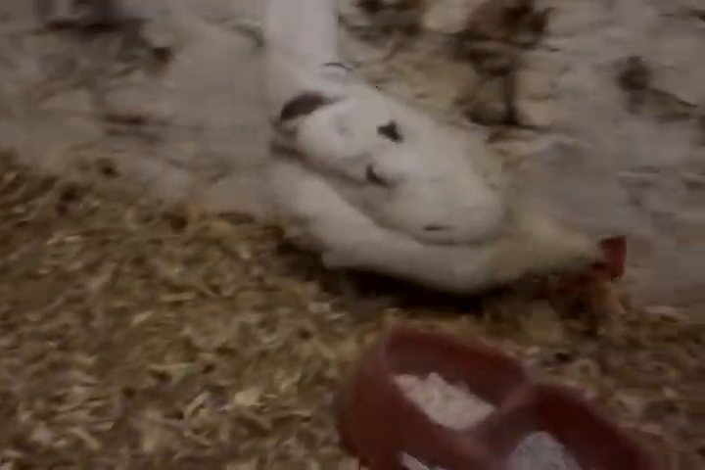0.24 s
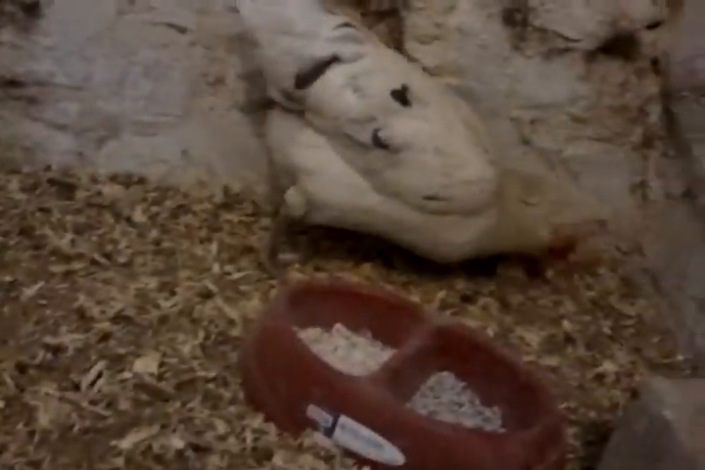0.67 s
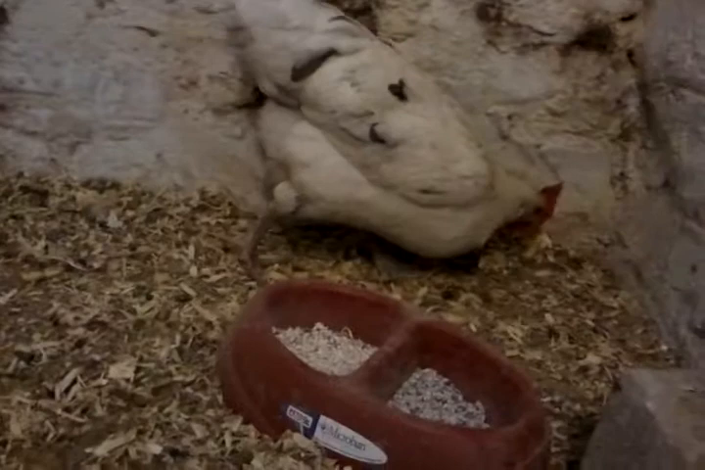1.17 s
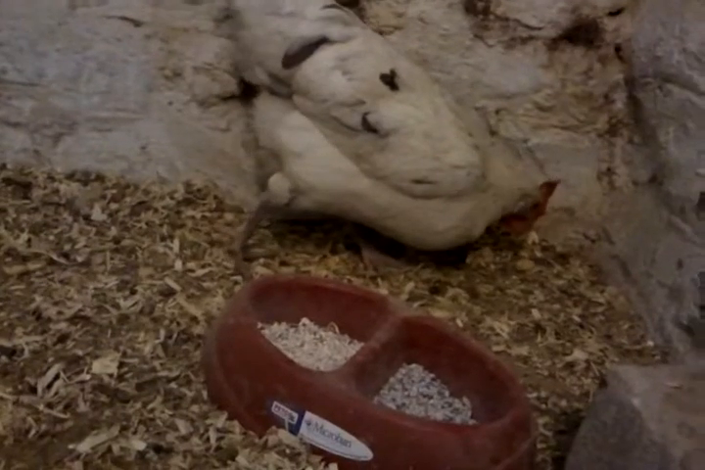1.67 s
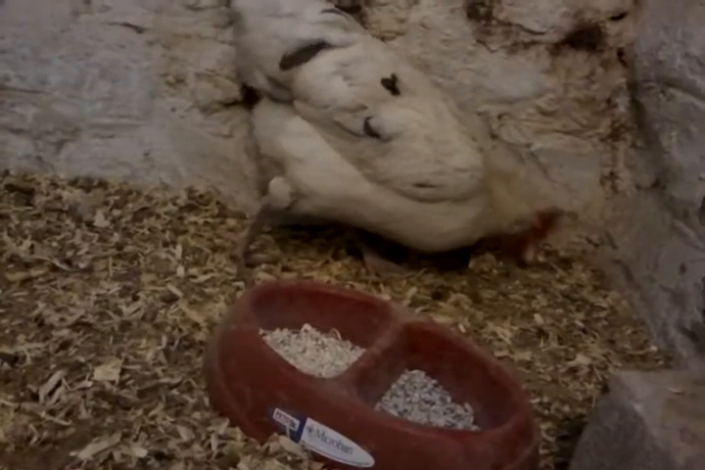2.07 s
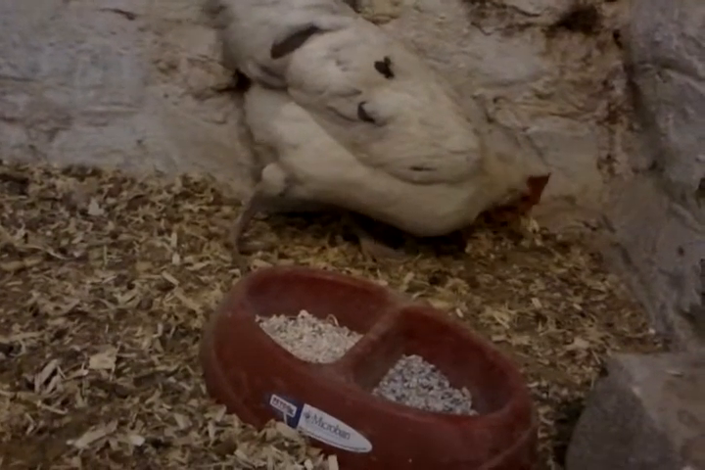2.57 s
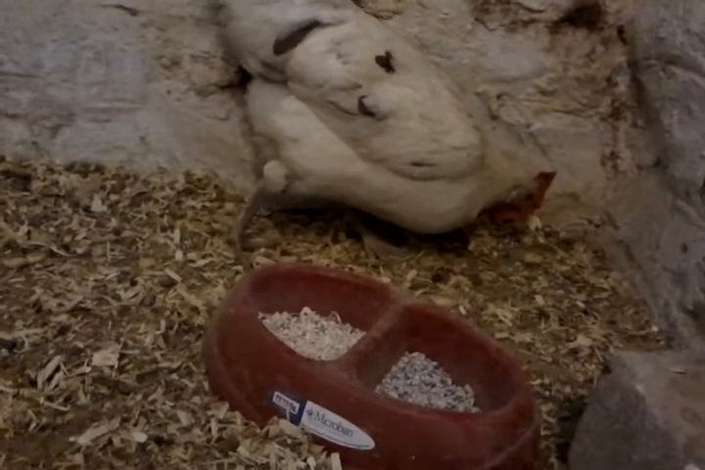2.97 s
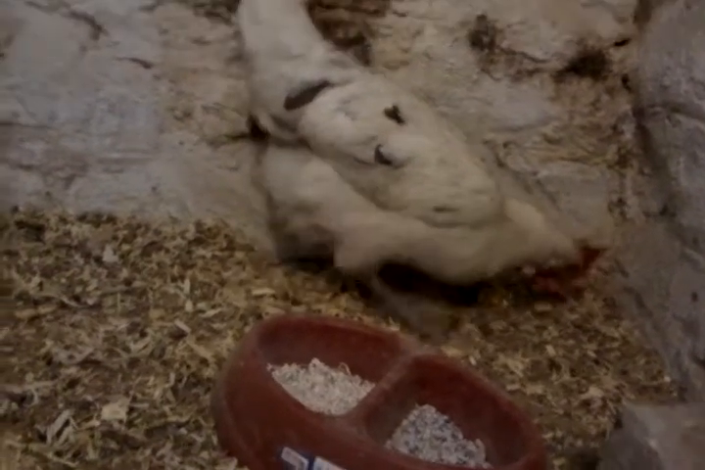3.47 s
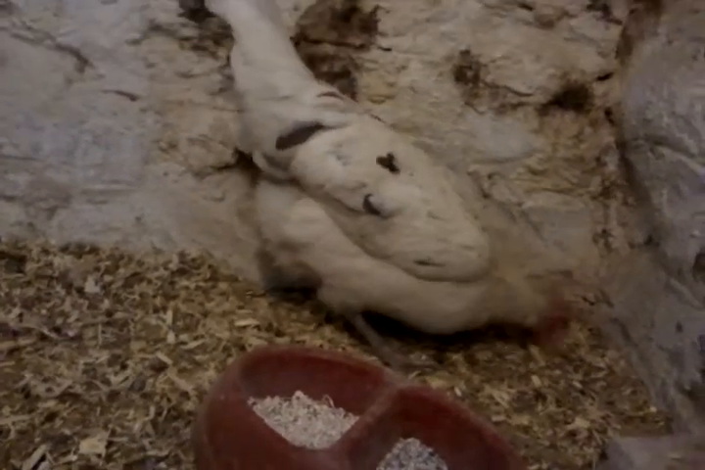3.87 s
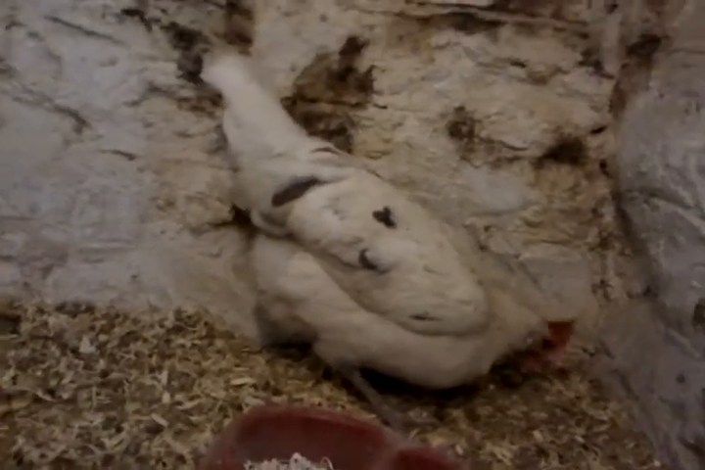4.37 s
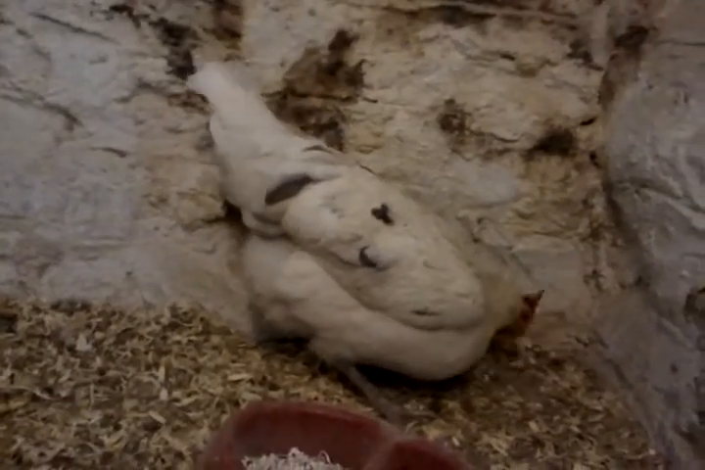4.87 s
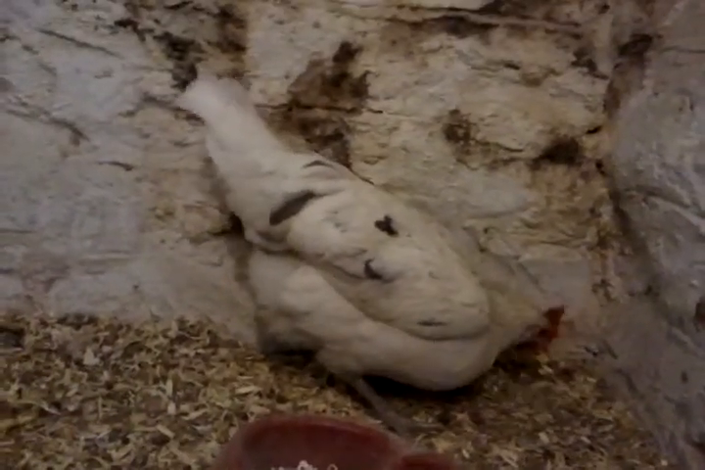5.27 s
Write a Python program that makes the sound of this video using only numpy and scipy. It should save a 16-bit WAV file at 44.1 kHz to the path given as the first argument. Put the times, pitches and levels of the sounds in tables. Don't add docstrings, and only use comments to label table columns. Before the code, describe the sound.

A hen pecks in quick irregular bursts, bright brittle snaps and crunches with small chips, pausing between, above quiet rumble and hiss.

```python
import sys
import numpy as np
from scipy import signal
from scipy.fft import rfft, irfft, next_fast_len
from scipy.io import wavfile
from scipy.ndimage import uniform_filter1d, map_coordinates

SR = 44100
rng = np.random.default_rng(int(sys.argv[2]) if len(sys.argv) > 2 else 0)


def volts(x):
    e = np.asarray(x, float) / 20
    return 10 ** e


def transcribe(u):
    v = np.clip(np.atleast_2d(u).T, -1, 1)
    q = np.round(v * 32767).astype(np.int16)
    wavfile.write(sys.argv[1], SR, q)


N = 244314

# hz, level_db
LITTER_COLOUR = [(300, -5), (900, -2), (1600, -4), (2300, -5), (3000, -5.5), (3900, -9), (4700, -10.5),
                 (5400, -10.5), (6300, -14), (7300, -17), (8300, -28.5), (9300, -29.5)]
LOW_RING_HZ, HIGH_RING_HZ = 3670, 5300
DRY_KNOCK_DB = -26.5


def unit(x):
    return x / np.sqrt(np.mean(x ** 2) + 1e-20)


def along(points, hz):
    f, v = np.transpose(points)
    return np.interp(np.log(hz + 1), np.log(f + 1), v)


def wobble(rate):
    knots = rng.standard_normal(int(N * rate / SR) + 4)
    return map_coordinates(knots, [np.arange(N) * rate / SR])


def filtered(x, response):
    m = next_fast_len(x.shape[-1] + 1024)
    return irfft(rfft(x, m) * response(np.fft.rfftfreq(m, 1 / SR)), m)[..., :x.shape[-1]]


def band(low_hz, high_hz):
    return lambda hz: 1 / (1 + (hz / high_hz) ** 4) / (1 + (low_hz / (hz + 1)) ** 4)


def add(track, s, sound):
    part = track[max(round(s * SR), 0):][:len(sound)]
    part += sound[:len(part)]


def beak(rows, echoed):
    grit_edge = 0.78
    bounce_s, bounce_db = 0.0016, -16.5
    out, t = np.zeros(N), np.arange(SR // 60) / SR
    lag = round(bounce_s * SR)
    for s, db, low_hz, high_hz, high_db, knock_db in rows:
        turn, size = rng.uniform(0, 2 * np.pi, 2), rng.uniform(0.75, 1.2)
        rise = (1 - np.exp(-t / 0.00063)) ** 2
        shape = rise * volts(-60 * t / (0.008 * size))
        rings = volts(min(-high_db, 0)) * np.sin(2 * np.pi * low_hz * t + turn[0])
        rings = rings + volts(min(high_db, 0)) * np.sin(2 * np.pi * high_hz * t + turn[1])

        grit = rng.standard_normal((2, len(t)))
        grit_band = band(0.85 * grit_edge * low_hz, 12000)
        crack = unit(filtered(grit[0], lambda hz: volts(along(LITTER_COLOUR, hz)) * grit_band(hz) ** 2))
        crack = crack * volts(0.49 * min(high_db, 0))
        knock = shape * filtered(grit[1], lambda hz: ground(hz) * band(700, 2600)(hz))
        knock = volts(knock_db + 2.5) * knock / np.abs(knock).max()

        snap = filtered(shape * (0.45 * rings + 0.28 * crack), lambda hz: band(0.58 * low_hz, 14000)(hz) ** 2)
        snap = snap + volts(bounce_db) * np.pad(snap, (lag, 0))[:len(t)]
        snap = snap / np.abs(snap).max() + knock
        add(out, s - 0.0006, volts(db) * snap)
        if echoed:
            aside = 0.69 * snap + 0.49 * shape * crack
            blunt = volts(-60 * t / 0.005)
            add(out, s, walls(volts(db + 8) * blunt * aside))
    return out


def snaps():
    # start_s, peak_db, low_ring_hz, high_ring_hz, high_ring_db
    crack_rows = [(0.1959, -17.5, 3570, 4940, -5.5), (0.2108, -7, 3680, 5500, -0.5),
                  (0.6489, -23.5, 3010, 4600, -9.5), (0.7816, -23.5, 3660, 5300, -1.5),
                  (0.9045, -22, 3000, 5080, 12.5), (1.0114, -11, 3880, 6100, -11.5),
                  (1.0332, -17, 3350, 5070, -8.5), (1.043, -15.5, 3613, 5500, 0),
                  (2.0366, -21.5, 3900, 5470, -1), (2.2471, -22.5, 3950, 5300, -13.5),
                  (2.3944, -25.5, 3920, 5700, -8), (2.4345, -21, 4150, 5360, -5),
                  (2.4413, -8, 4190, 5520, -4.5), (2.5069, -22, 4670, 5770, 16),
                  (2.5107, -17, 4740, 5860, 7), (2.5388, -17.5, 3940, 6000, -15.5),
                  (3.994, -15.5, 4140, 5000, -17), (4.0667, -18.5, 4050, 5200, -4),
                  (4.7971, -18.5, 3800, 5050, 1), (4.8194, -14, 3750, 5130, -0.5),
                  (5.0095, -24, 4020, 5700, 3), (5.138, -11, 3920, 6040, -14),
                  (5.232, -22.5, 3800, 5830, -4), (5.5257, -23, 4090, 5830, 8)]
    # start_s, peak_db, louder_ring_hz, knock_db
    knock_rows = [(0.0593, -29.5, 3060, -12), (0.3537, -44, 6350, 1.5), (0.8947, -29.5, 5070, -15),
                  (0.967, -48, 2560, -6), (0.99, -36.5, 7080, -11), (1.0188, -20, 3220, -15),
                  (1.13, -41, 5760, -11), (1.1348, -33, 3430, -4.5), (1.2653, -40.5, 3720, -13),
                  (1.417, -37, 3180, -7), (2.025, -35, 4000, 3.5), (2.1491, -17, 5860, -12),
                  (2.227, -43, 3270, -8), (2.2326, -20.5, 5930, -18), (2.2444, -26.5, 5880, -10.5),
                  (2.402, -27.5, 3710, -13), (2.522, -23, 3880, -8.5), (2.924, -32.5, 3880, -12.5),
                  (3.9604, -38, 4030, -20.5), (3.973, -31.5, 4400, -23), (3.9767, -21, 4180, -17),
                  (3.9794, -17.5, 3900, -16.5), (4.7858, -42, 5180, -15), (4.8949, -20, 4390, -15),
                  (4.9036, -34, 5870, -21), (4.965, -47, 3800, -14), (4.9926, -35, 3880, -8),
                  (5.29, -28.5, 5880, -8), (5.3461, -27, 5890, -12), (5.521, -42, 5800, -22)]
    # start_s, peak_db, louder_ring_hz
    nip_rows = [(.068, -36.5, 3270), (0.089, -40, 3000), (0.164, -30, 3516), (0.1866, -30.5, 4970),
                (0.205, -29.5, 3400), (0.2223, -19, 3680), (0.698, -40, 3640), (0.7611, -24.5, 5430),
                (0.8612, -36.5, 4890), (0.898, -31, 4980), (0.914, -29, 5300), (1.0236, -20.5, 6200),
                (1.0285, -18, 3360), (1.161, -36, 3870), (1.3746, -44, 3820), (1.3856, -33.5, 5100),
                (1.428, -39.5, 3220), (2.0684, -24, 3490), (2.2347, -27, 3320), (2.4566, -31.5, 4110),
                (2.469, -25, 4240), (2.5145, -25, 5930), (2.7976, -31.5, 4000), (2.8, -31.5, 4600),
                (2.93, -35, 3900), (4.01, -27.5, 4300), (4.8285, -43.5, 4860), (4.931, -30.5, 4460),
                (5.1356, -18, 4200), (5.156, -26, 3750)]
    # start_s, peak_db
    crumb_rows = [(0.1457, -45), (0.4774, -51), (0.608, -54), (0.688, -40), (2.384, -54.5), (.671, -52),
                  (0.756, -38), (1.2625, -47), (1.468, -46), (2.019, -32), (2.213, -35), (2.2174, -36),
                  (2.383, -42), (2.4215, -28.5), (2.7846, -37), (2.9382, -54.5), (3.6069, -56),
                  (3.959, -37.5), (4.0579, -38), (4.119, -55), (4.164, -54.5), (4.1674, -28.5),
                  (5.0197, -30), (5.0808, -44), (5.223, -44), (5.3004, -35), (5.4318, -54)]
    ring_scatter, split_hz, weaker_ring_db = 0.089, 4700, -6
    usual_knock_db, knock_scatter_db = -30, 4

    light = [(s, db, hz, None) for s, db, hz in nip_rows] + [(s, db, None, None) for s, db in crumb_rows]
    rows = []
    for s, db, hz, knock_db in knock_rows + light:
        chance = rng.standard_normal(3)
        low_hz, high_hz = np.array([LOW_RING_HZ, HIGH_RING_HZ]) * (1 + ring_scatter * chance[:2])
        if knock_db is None:
            knock_db = usual_knock_db + knock_scatter_db * chance[2]
        if hz is not None and hz > split_hz:
            rows.append((s, db, low_hz, hz, -weaker_ring_db, knock_db))
        else:
            rows.append((s, db, hz or low_hz, high_hz, weaker_ring_db, knock_db))
    return rows + [(*row, DRY_KNOCK_DB) for row in crack_rows]


def chips():
    # start_s,
    # peak_db, low_ring_hz, high_ring_hz, high_ring_db
    chip_rows = [(0.0705, -39, 3310, 4710, -15), (0.149, -39.5, 2560, 5140, 0),
                 (0.2056, -28, 3480, 5790, -6.5), (0.2193, -21, 3800, 5500, 4),
                 (0.2285, -21, 3670, 5800, -4), (0.25, -31, 3860, 6340, -2), (0.437, -50, 3500, 5870, 12),
                 (0.7714, -32.5, 3800, 5200, -12), (0.779, -27, 4100, 6000, 2),
                 (0.7862, -29.5, 4100, 6070, 4), (1.019, -30.5, 3250, 5150, -20.5),
                 (1.0486, -21, 3350, 5950, -8.5), (1.0561, -32, 3080, 4970, -3),
                 (1.3443, -53, 2500, 5000, -15), (1.3866, -37, 2520, 4070, -3),
                 (2.0685, -26.5, 3700, 5870, -9), (2.187, -38.5, 3740, 5950, 6),
                 (2.4595, -29, 4150, 5300, 0.5), (2.4617, -24, 4080, 5560, -11.5),
                 (2.471, -30.5, 3950, 5500, 7), (2.4746, -32.5, 4550, 4950, -1),
                 (2.4903, -33, 4370, 5140, -4), (2.54, -18, 3760, 4936, -6.5),
                 (2.5473, -32, 3990, 6050, -12), (2.5543, -42, 3860, 4730, -2),
                 (3.477, -54, 3600, 6960, 12), (4.0062, -32, 4340, 4810, -4), (4.018, -41, 4400, 4900, 6),
                 (4.079, -27, 4020, 4780, -10.5), (4.0838, -24, 4620, 5800, 4),
                 (4.0898, -28.5, 3720, 5270, -8), (4.8352, -26.5, 4600, 5100, 5),
                 (4.839, -35.5, 4440, 5070, -10), (4.8967, -18.5, 4090, 4650, -7),
                 (4.9097, -28, 4660, 4890, -2), (4.9136, -30, 4600, 5000, 7),
                 (5.1408, -22, 4280, 5940, -21), (5.156, -25, 3900, 5000, 6.5),
                 (.1975, -18, 3400, 5000, -6),
        (4.04, -39, 4600, 5300, -17),
        (3.9755, -23, 4100, 5800, -14),
        (2.4445, -24, 5400, 6000, -6.5),
        (.1866, -23.5, 3300, 4900, 0),
        (.2107, -13.5, 4000, 6500, -1),
        (4.8948, -26, 4300, 6100, 8),
        (4.8183, -28, 2200, 5100, 2),
        (5.224, -41.5, 4000, 5900, 12),
        (0.68, -34.5, 4400, 5900, -1.5),
    ]
    return [(*row, DRY_KNOCK_DB) for row in chip_rows]


def walls(sound):
    # hz, t60_s
    wall_decay = [(300, 0.97), (1500, 0.24), (4000, 0.19), (8000, 0.12)]
    hz, t, z = signal.stft(rng.standard_normal(SR // 4), SR, nperseg=128)
    decay = volts(-60 * t / along(wall_decay, hz)[:, None])
    plaster = (hz[:, None] / 4000) ** 0.26 * decay
    tail = signal.istft(z * plaster, SR, nperseg=128)[1]
    t = np.arange(len(tail)) / SR
    clumps = np.repeat(rng.standard_normal(len(t) // 40 + 1), 40)[:len(t)]
    clumps = volts(2.2 * np.exp(-t / 0.04) * clumps)
    tail = tail * clumps * np.clip((t - 0.003) / 0.0053, 0, 1)
    return signal.fftconvolve(sound, tail / np.linalg.norm(tail))


def ground(hz):
    # centre_hz, width_hz, level_db
    earth = [(433, 64, -7), (812, 59, -6), (1570, 290, -4), (2315, 110, -5.5)]
    peaks = sum(volts(db) / (1 + ((hz - centre_hz) / width) ** 2) for centre_hz, width, db in earth)
    return peaks + 0.28 * band(480, 2500)(hz)


def litter():
    over_db, under_db = 1, 2.5
    edge_share, leak = 0.62, 0.48
    out, t = np.zeros(N), np.arange(SR // 4) / SR
    for s, db, centre_hz, deep_db, rise, t60 in strokes():
        clumps = np.clip(rng.standard_normal(len(t) // 50 + 1), -2.5, 1.4)
        clumps = np.repeat(volts(4 * clumps), 50)[:len(t)]
        grains, shells = rng.standard_normal((2, len(t))), rng.standard_normal(200)
        edge_band = band(edge_share * min(centre_hz, LOW_RING_HZ), 14000)

        def ripple(hz):
            return volts(2.5 * np.interp(hz, np.linspace(0, SR / 2, len(shells)), shells))

        def bright(hz):
            octaves = np.log2((hz + 1) / centre_hz)
            skirt_db = np.maximum(over_db * octaves, -under_db * octaves)
            peak = 1 + 1.4 / (1 + ((hz - centre_hz) / 650) ** 2)
            edge = leak + edge_band(hz) ** 2
            return edge * ripple(hz) * volts(along(LITTER_COLOUR, hz) - skirt_db) * peak

        shape = (1 - np.exp(-t / max(rise, 0.0005))) * volts(-60 * t / max(t60, 0.02))
        crunch = unit(filtered(grains[0] * uniform_filter1d(clumps, size=25), bright))
        deep = unit(filtered(grains[1], lambda hz: ripple(hz) * ground(hz)))
        add(out, s, volts(db - 18.5) * shape * (crunch + volts(deep_db) * deep))
    return out


def strokes():
    # start_s, level_db, centre_hz, deep_db
    stab_rows = [(.0014, -37.5, 5320, -18), (.2164, -31, 3540, -36), (.0583, -20.5, 3480, -9),
                 (.1612, -17, 3370, -15), (.7735, -27, 3860, -5), (1.009, -13.5, 3070, -22),
                 (1.1313, -29, 4800, 1.5), (1.2641, -29, 3150, -10), (1.3738, -32, 3840, -3.5),
                 (2.148, -15, 3800, -14.5), (2.1748, -25, 5800, -2.5), (2.2308, -27, 5830, 0),
                 (2.4472, -23.5, 5600, -12), (2.4562, -32, 4400, -26), (2.5083, -30, 5920, -29),
                 (2.7861, -30.5, 3850, -6), (2.9238, -26.5, 3800, -13.5), (3.468, -44, 5400, -17),
                 (3.9932, -20, 3950, -29), (4.0602, -11.5, 4900, -8), (4.8247, -35.5, 4830, 8),
                 (5.0077, -25, 5000, -9.5), (5.1352, -13, 4230, -12), (5.1513, -37, 3890, -26),
                 (5.2295, -27, 5150, -40), (5.2944, -44, 3610, 12.5), (5.3456, -29.5, 5150, -1.5),
                 (5.4304, -54, 5090, 9), (5.4869, -43, 5570, -4), (5.5094, -40.5, 5680, 7.5)]
    # start_s, level_db, centre_hz, deep_db
    sweep_rows = [(0.3525, -36.5, 6640, 0.5), (0.6498, -25.5, 3000, -40), (0.763, -15.5, 5560, -9.5),
                  (0.8933, -24.5, 3300, -4), (1.0106, -14.5, 3700, -3), (1.4182, -36, 3020, -5),
                  (2.0156, -23, 3600, -7), (2.2454, -24, 3460, -16), (2.394, -25, 3920, -3.5),
                  (2.5401, -26, 4200, -2), (3.605, -38, 6300, -13), (3.9595, -17.5, 4200, -5.5),
                  (4.1624, -37.5, 4960, 0.5), (4.7874, -26.5, 5110, -2.5), (4.8956, -19.5, 4770, -10.5),
                  (5.074, -35.5, 5400, -17)]
    # start_s, level_db, centre_hz, deep_db
    rustle_rows = [
        (.27, -33.5, 4500, -25),
        (.38, -31.5, 6050, -8.5),
        (.45, -39.5, 4500, -6),
        (3.38, -41.5, 4660, -19),
        (3.66, -40, 5300, -17),
    ]
    kinds = [(stab_rows, 0.0044, 0.21), (sweep_rows, 0.0068, 0.32), (rustle_rows, 0.033, 0.53)]  # rise_s, t60_s
    return [(*row, rise, t60) for rows, rise, t60 in kinds for row in rows]


def hollows():
    # start_s, level_db, pitch_hz, t60_s
    shell_rows = [(.06, -49, 3050, .12), (.162, -32, 3440, .04), (.216, -29, 5750, .12),
                  (.216, -35, 3600, .15), (.655, -39, 2940, 0.088), (0.869, -47, 3050, 0.06),
                  (.897, -43, 3070, 0.2), (1.02, -43, 840, 0.27), (1.02, -44, 1650, 0.16),
                  (1.045, -33, 3200, 0.12), (2.25, -40.5, 3420, 0.14), (2.45, -35.5, 4200, 0.23),
                  (2.543, -40.5, 4170, 0.22), (3.958, -31.5, 4150, 0.057), (4.0, -40, 4480, 0.11),
                  (4.829, -40.5, 4900, 0.16), (5.146, -36, 3850, 0.08), (5.165, -49, 3000, .18),
                  (.671, -51, 2970, 0.096), (.24, -41.5, 5900, 0.2), (1.27, -53, 3600, 0.1),
                  (1.72, -61, 1000, .08), (2.452, -37, 5600, 0.25), (2.507, -42.5, 5850, .05),
                  (4.064, -39.5, 5330, 0.11), (4.80, -48, 5100, .08), (4.905, -38, 4600, .12),
                  (4.938, -47, 4700, 0.071), (5.137, -30, 4030, .05), (5.24, -47, 5200, 0.086),
                  (5.245, -48.5, 3500, .12), (2.539, -39, 1470, .04), (2.52, -48, 1450, 0.031),
                  (.765, -41, 6380, 0.17), (4.826, -34, 4600, 0.14), (5.289, -47, 2500, .03)]
    q, rise_s, fits_db = 11, 0.0046, -1
    out, t = np.zeros(N), np.arange(SR // 6) / SR
    for s, db, centre_hz, t60 in shell_rows:
        fits = np.repeat(volts(fits_db * rng.standard_normal(len(t) // 90 + 1)), 90)[:len(t)]
        rubbing = fits * rng.standard_normal(len(t))
        ring = unit(filtered(rubbing, lambda hz: 1 / (1 + (2 * q * (hz / centre_hz - 1)) ** 2)))
        add(out, s, volts(db - 60 * t / t60) * (1 - np.exp(-t / rise_s)) * ring)
    return out


def thuds():
    # start_s, peak_db, pitch_hz, puff_db
    thud_rows = [
        (0.782, -35, 220, -40),
        (1.022, -35.5, 202, -28),
        (1.525, -51, 640, -22),
        (2.15, -41, 176, 3.5),
        (2.525, -32, 150, -8),
        (4.894, -37.5, 157, -2),
        (5.137, -32.5, 157, -27),
    ]
    out, t = np.zeros(N), np.arange(SR // 6) / SR
    for s, db, hz, puff_db in thud_rows:
        puff = volts(puff_db) * unit(filtered(rng.standard_normal(len(t)), band(160, 740)))
        shape = volts(db - 60 * t / 0.047) * (1 - np.exp(-t / 0.0029))
        add(out, s, 1.42 * shape * (np.sin(2 * np.pi * hz * t) + puff))
    return out


def metal():
    # start_s, pitch_hz, level_db, t60_s
    ping_rows = [(0.0, 5322, -61, .8), (0.0, 3146, -66, .6), (1.02, 5346, -53.5, 1.8),
                 (1.02, 3160, -57.5, 1.3), (1.02, 7048, -77, 2.5), (1.936, 5421, -65, 1.1),
                 (1.936, 3182, -75, 1.5), (1.91, 6878, -73, 2.5), (3.24, 5324, -73.5, 2.5),
                 (3.24, 3120, -76, 1.5), (3.6, 5120, -63, .6), (4.58, 5423, -75, 2.5),
                 (5.08, 5400, -53, .2)]
    out, t = np.zeros(N), np.arange(SR) / SR
    for s, hz, db, t60 in ping_rows:
        fade = volts(db - 60 * t / t60 + 2.6 * wobble(15)[:SR]) * (1 - np.exp(-t / 0.004))
        fade = fade * np.clip(5 * (0.65 - t), 0, 1)
        add(out, s, fade * np.sin(2 * np.pi * hz * t + 0.7 * wobble(20)[:SR]))
    return out


def engine():
    # time_s, level_db
    firing_curve = [(0.0, -55), (0.11, -75), (0.65, -66), (0.83, -76), (1.0, -60.5), (1.16, -74),
                    (1.8, -64), (1.83, -70), (2.59, -67), (2.65, -54.5), (2.99, -72.5), (3.44, -53),
                    (4.69, -63), (4.74, -55), (5.06, -64), (5.54, -54)]
    # time_s, level_db
    drone_curve = [(0.0, -69), (.3, -61), (.6, -61), (0.94, -57), (1.22, -61), (2.021, -67.5),
                   (3.42, -66.5), (3.81, -67.5), (4.03, -59.5), (4.5, -65), (4.77, -62.5), (5.2, -54.5),
                   (5.54, -51)]
    t = np.arange(N) / SR
    boom_db, drone_db = [np.interp(t, *np.transpose(rows)) for rows in (firing_curve, drone_curve)]
    turn = 2 * np.pi * np.cumsum(88 + 0.916 * wobble(1.8)) / SR
    boom = np.sqrt(2) * volts(0.96 * wobble(7.2)) * np.sin(turn + 0.66 * wobble(4.5))
    side = np.zeros(N)
    for half_order, db in [(3, -67), (4, -68), (5, -68)]:
        side += volts(db + 1.3 * wobble(4.8)) * np.sin(half_order / 2 * turn + 1.1 * wobble(13))

    def drone_colour(hz):
        return 1 / (1 + ((hz - 205) / 28) ** 4) + 0.25 / (1 + ((hz - 340) / 50) ** 2)

    drone = unit(filtered(rng.standard_normal(N), drone_colour))
    return volts(boom_db + 0.5) * boom + side + volts(drone_db - 1.5 + 2.4 * wobble(3.6)) * drone


def air():
    # hz, db_per_hz
    air_colour = [(12, 1.5), (30, 1.5), (60, -0.5), (110, -4.5), (250, -9), (400, -10.5), (800, -15),
                  (1500, -19.5), (3000, -23), (5000, -24), (7050, -29), (7800, -48.5), (8700, -47),
                  (10000, -78)]
    noise = unit(filtered(rng.standard_normal(N), lambda hz: volts(along(air_colour, hz))))
    return volts(-59 + 0.6 * wobble(4)) * noise


def scene():
    hen = beak(snaps(), True) + beak(chips(), False) + litter() + hollows() + thuds()
    return (hen + metal() + engine() + air())[None]


def top_cut(x):
    return signal.sosfilt(signal.butter(12, 8860, fs=SR, output="sos"), x)


def record(dry):
    def camera(hz):
        rolloff = 1 / np.sqrt(1 + (hz / 8200) ** 24) / (1 + (hz / 9600) ** 16)
        return rolloff * (1 - 0.55 / (1 + ((hz - 8020) / 130) ** 2))

    offset = -0.041
    return top_cut(filtered(dry, camera) + offset)


dry = scene()
out = record(dry)
transcribe(out)
```